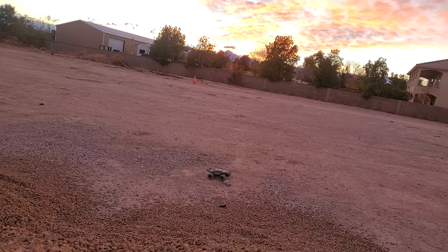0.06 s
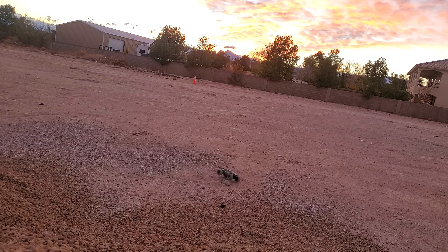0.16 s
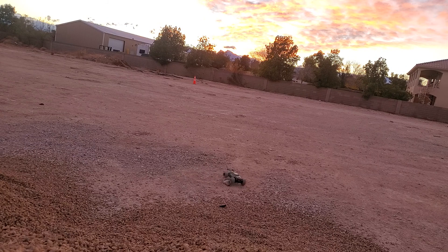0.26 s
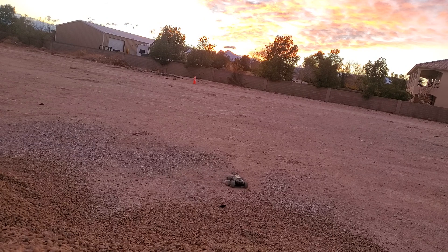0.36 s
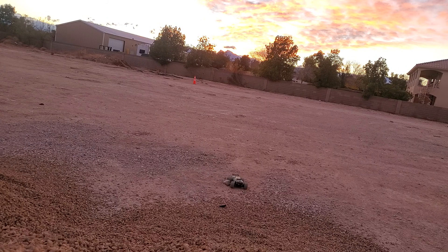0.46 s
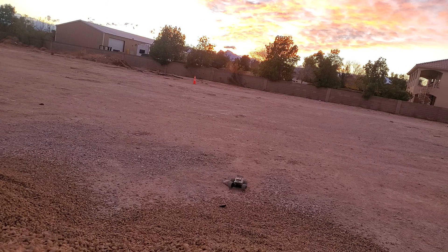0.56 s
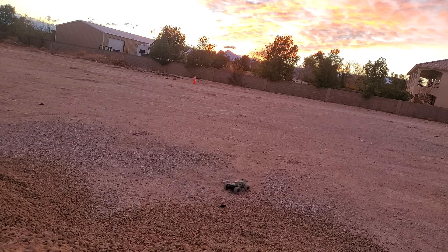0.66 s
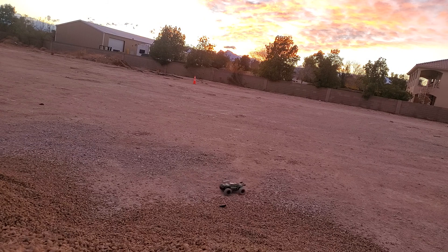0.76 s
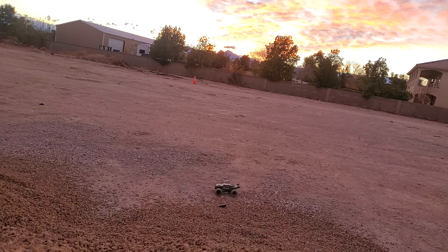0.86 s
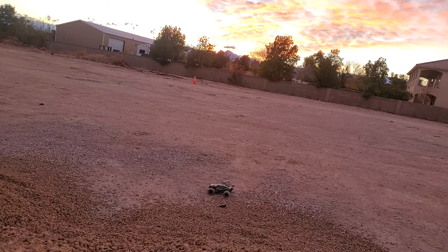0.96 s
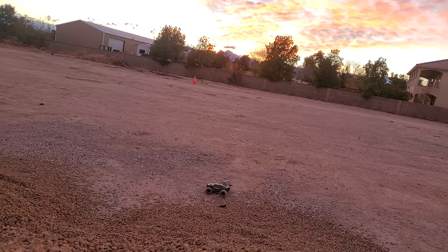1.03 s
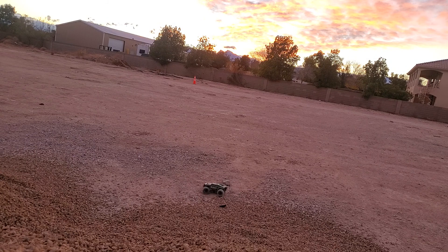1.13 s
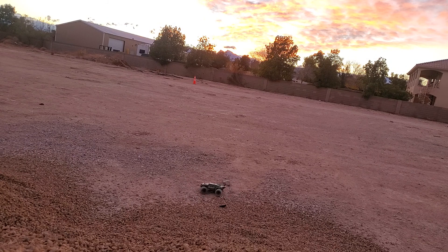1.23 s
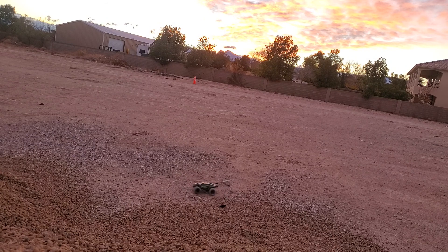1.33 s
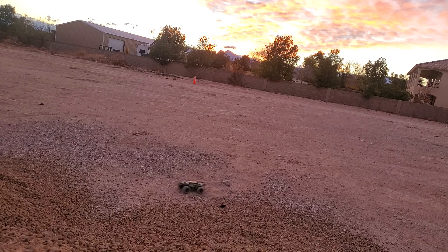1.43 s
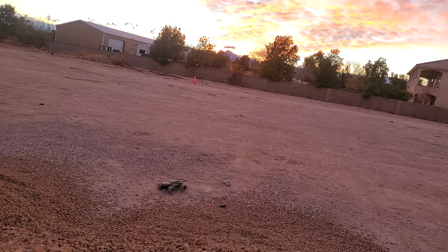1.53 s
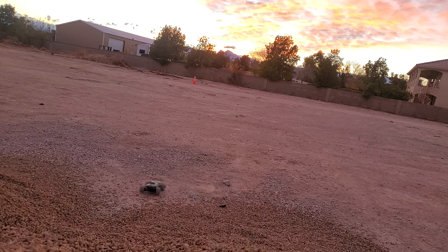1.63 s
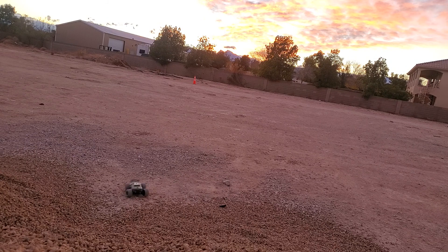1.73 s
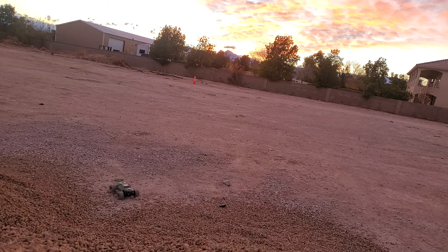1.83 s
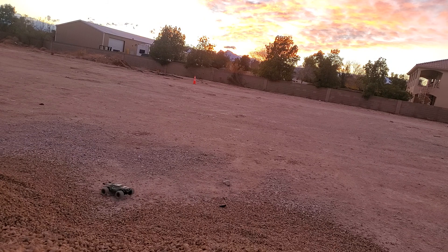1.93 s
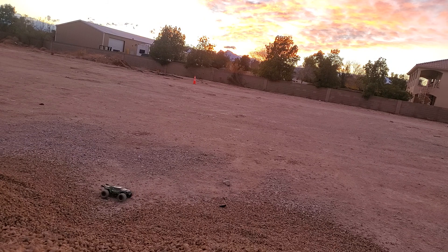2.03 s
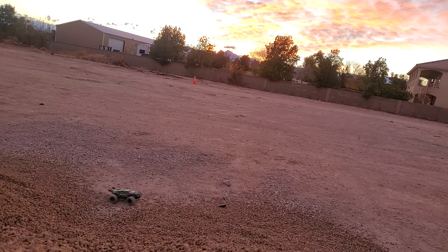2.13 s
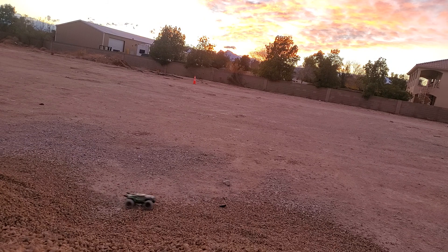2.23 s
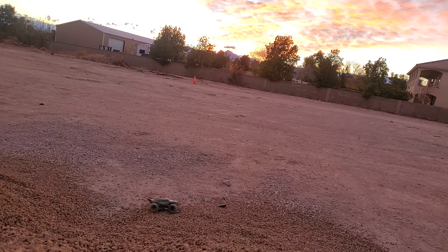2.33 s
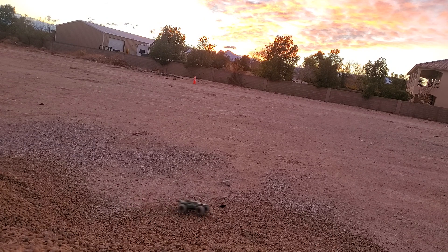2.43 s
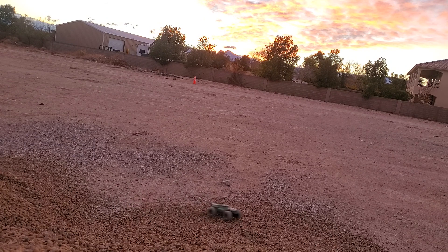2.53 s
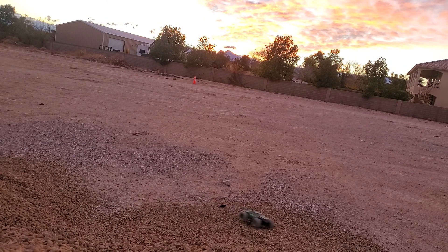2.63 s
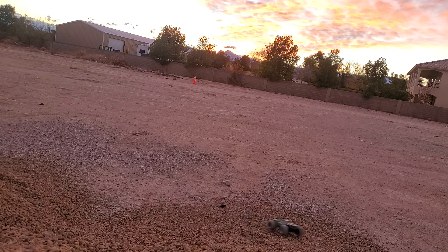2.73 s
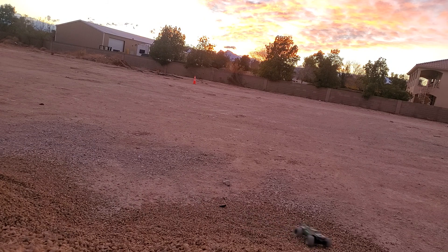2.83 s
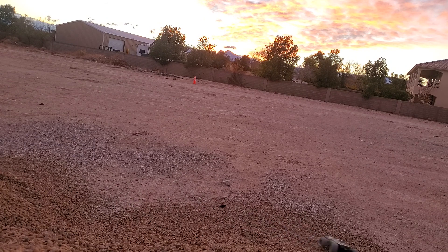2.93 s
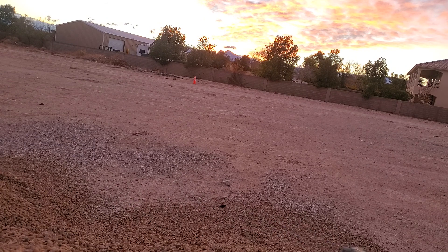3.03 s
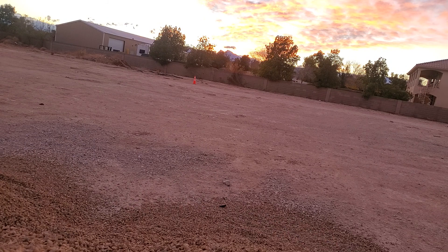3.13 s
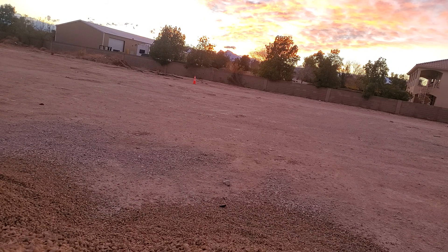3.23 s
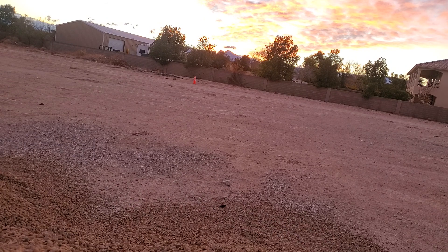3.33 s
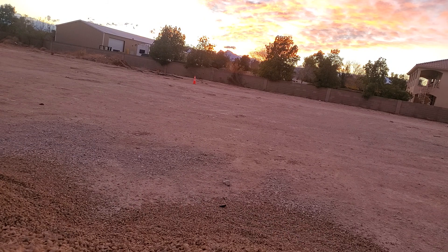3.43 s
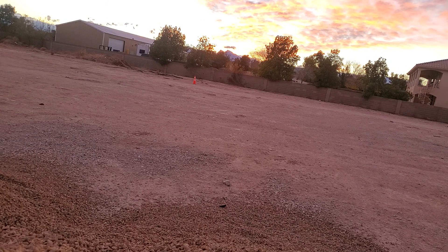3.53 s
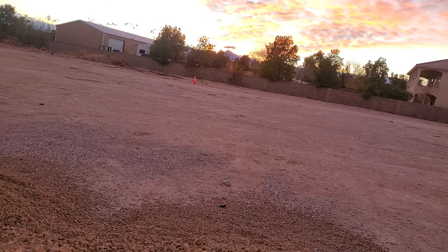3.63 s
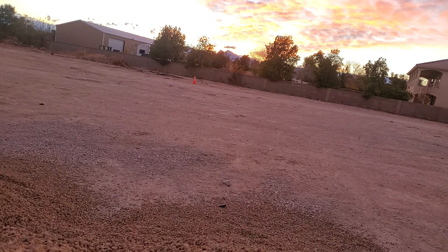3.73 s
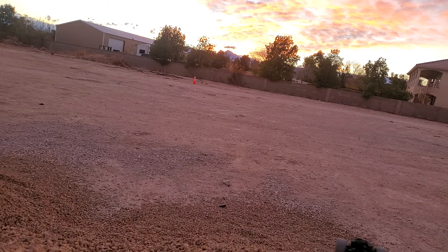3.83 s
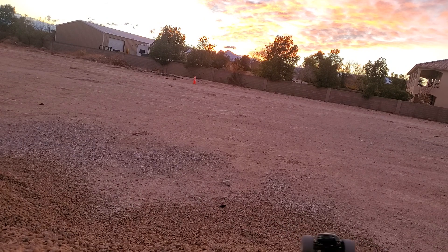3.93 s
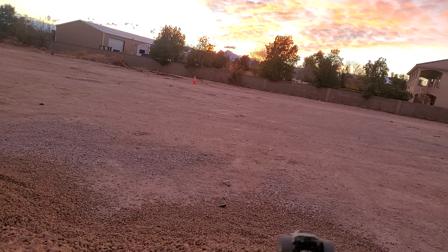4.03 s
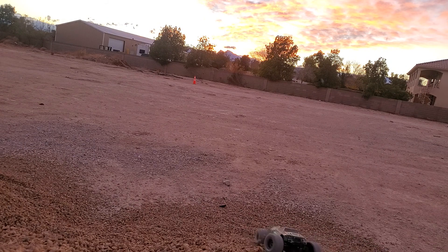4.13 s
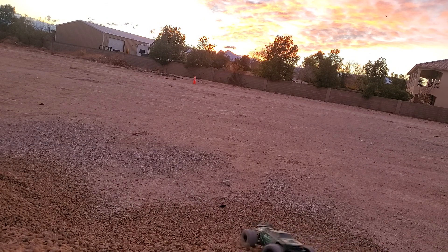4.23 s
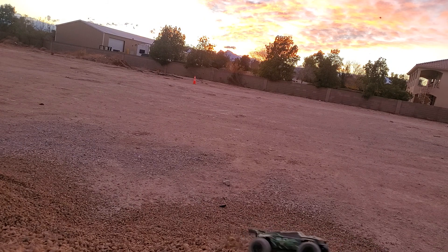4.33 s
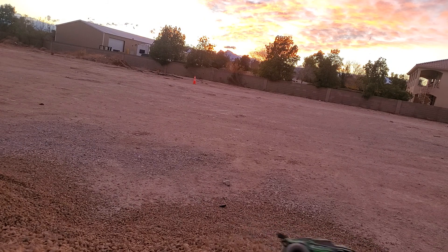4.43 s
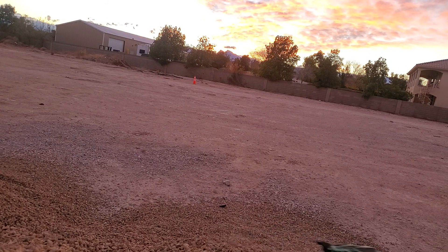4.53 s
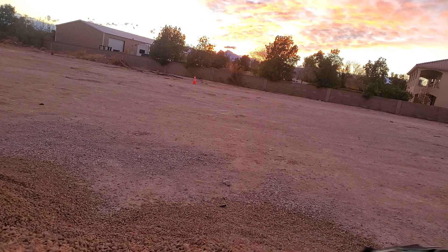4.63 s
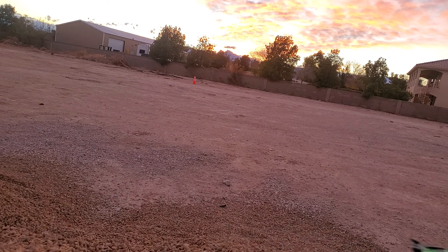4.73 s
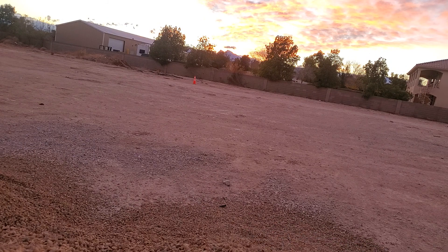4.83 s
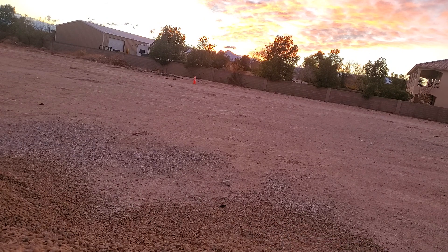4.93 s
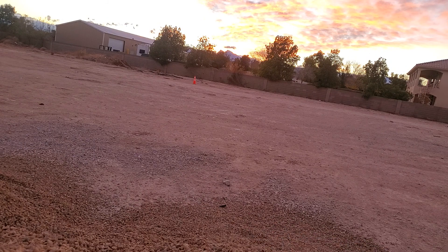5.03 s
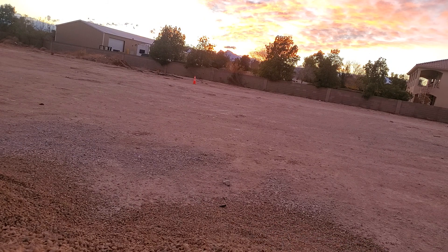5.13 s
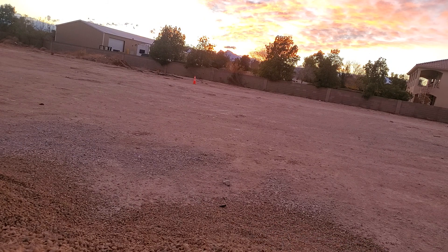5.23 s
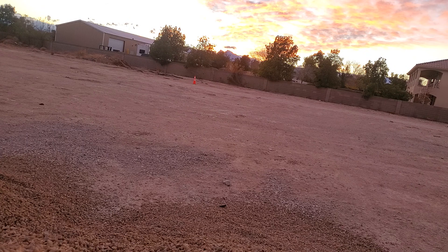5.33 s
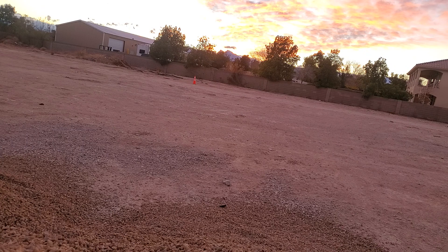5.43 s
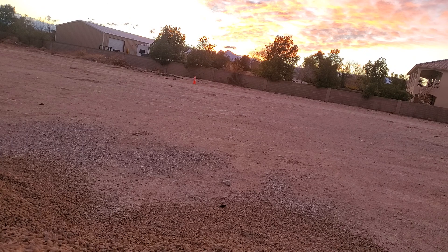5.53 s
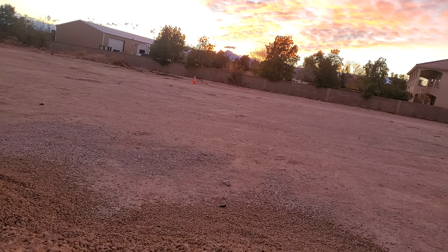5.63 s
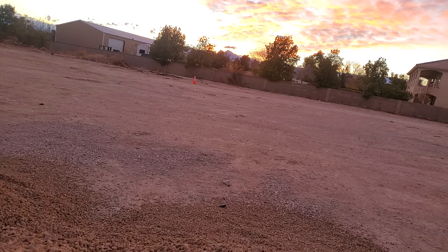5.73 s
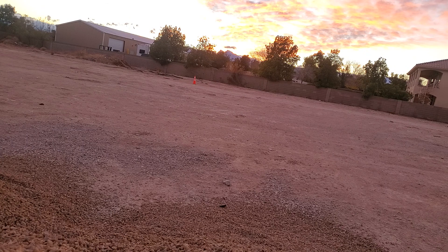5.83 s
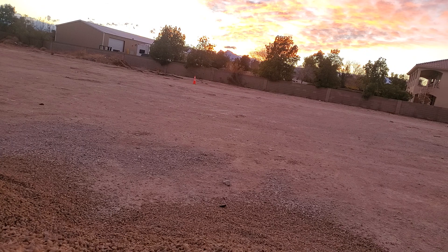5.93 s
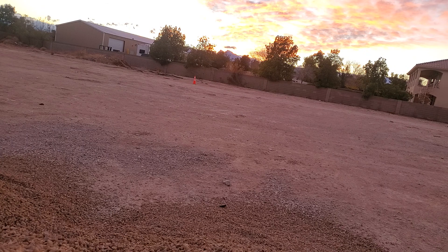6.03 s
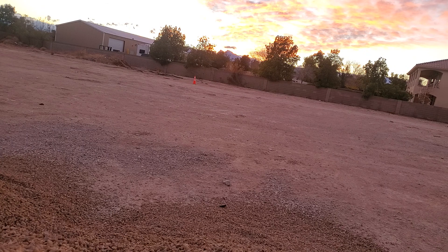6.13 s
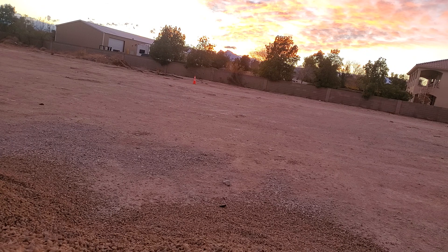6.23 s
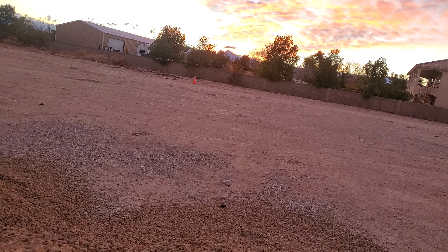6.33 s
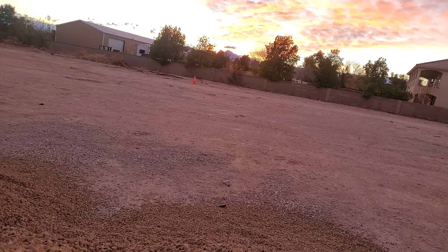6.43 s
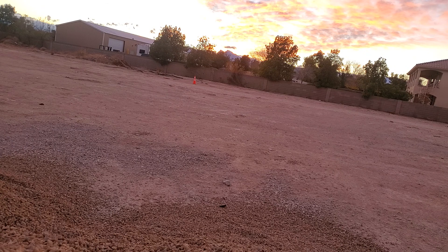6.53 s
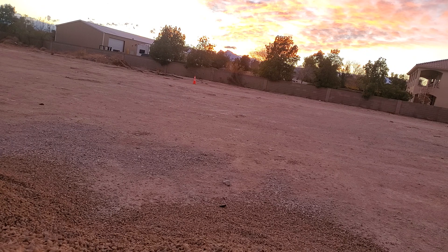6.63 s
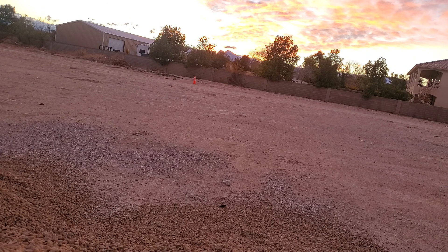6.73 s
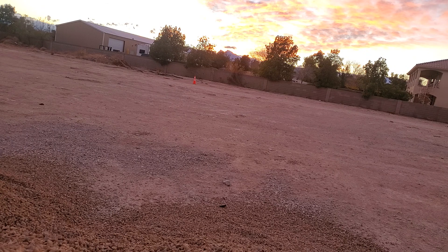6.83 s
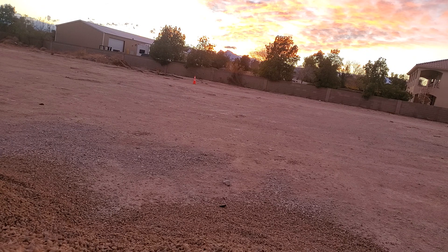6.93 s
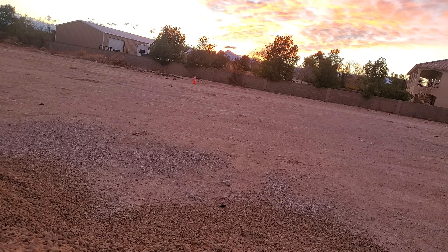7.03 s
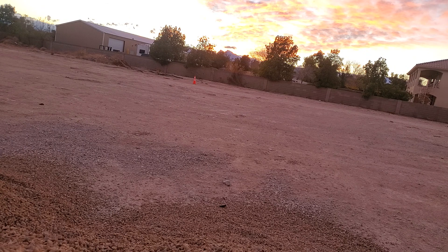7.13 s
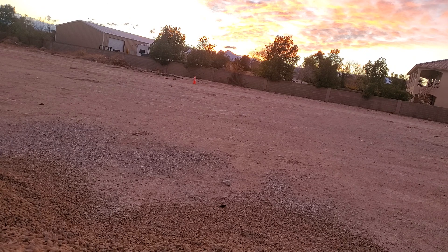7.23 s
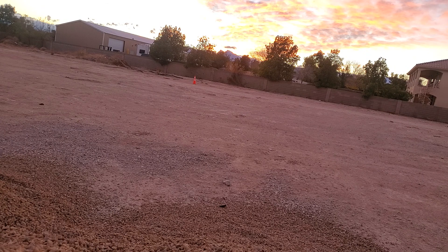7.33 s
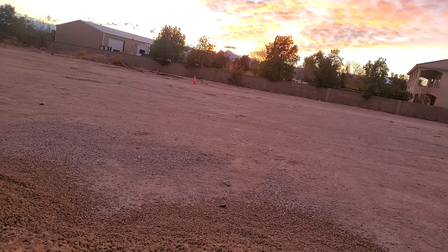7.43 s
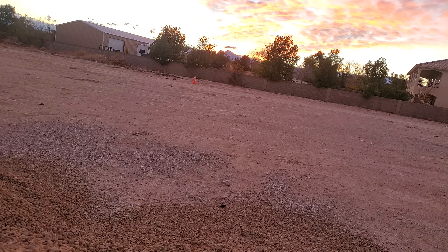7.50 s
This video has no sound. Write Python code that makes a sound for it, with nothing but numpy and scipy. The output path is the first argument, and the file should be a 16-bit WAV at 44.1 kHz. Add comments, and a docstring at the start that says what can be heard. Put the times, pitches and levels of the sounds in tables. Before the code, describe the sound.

A small radio-controlled car drives on dirt and gravel in an open yard, heard in stereo over a soft, low outdoor rumble. In the first second it makes short scuffing bursts near the centre, with a very faint thin whine around 0.5 seconds and a brief gear whir at 1 second. From about 1.3 seconds it weaves nearer, first slightly left and then to the right: hollow tyres drum and skid, stones crunch, grit sprays and the plastic chassis knocks over bumps. The loudest part comes from 3.9 to 4.7 seconds, as it sweeps close to the microphone and flung pebbles clack sharply on landing. From 5 seconds it is much quieter and off to the right, with a few fainter bursts of wheelspin and light knocks until the end at about 7.5 seconds.

```python
"""A small radio-controlled car on dirt and gravel in a yard; two spaced microphones, low outdoor rumble.
It starts with short throttle jabs, a thin drive whine and, at 1 s, a brief gear whir.
From 1.3 s it weaves nearer: hollow tyres drum, stones crunch, grit sprays, the chassis knocks.
At 3.9-4.7 s it sweeps close by, flung pebbles clacking as they land.
From 5 s it leaves to the right with a few fainter jabs."""
import sys
import numpy as np
from scipy import signal
from scipy.fft import rfft, irfft, next_fast_len
from scipy.io import wavfile
from scipy.ndimage import map_coordinates

SR = 44100
rng = np.random.default_rng(int(sys.argv[2]) if len(sys.argv) > 2 else 0)


def to_wav(s):
    """Save 16-bit WAV."""
    ch = np.atleast_2d(s).T  # columns
    pcm = np.round(np.clip(ch, -1, 1) * 32767)  # PCM
    wavfile.write(sys.argv[1], SR, pcm.astype(np.int16))


N = 333428

# Spectra, each: freq_hz, relative_db
# hollow tyres and shell
TYRE_SPECTRUM = [(150, -11.5), (330, -5.5), (430, -1), (560, 1), (720, 2), (880, -0.5), (1150, -4.5),
                 (1400, -12.5), (1700, -7), (2200, -9.5), (3200, -66), (6000, -19)]
# car's weight hitting the ground
THUD_SPECTRUM = [(50, -32), (90, 0.5), (150, -2), (250, -1), (400, -5), (800, -38), (2000, -33)]
# tread sliding on packed dirt
RASP_SPECTRUM = [(700, -6.5), (1100, -0.5), (1450, 4), (1900, 0), (2400, -8.5), (3100, -8.5), (4200, -6),
                 (7000, -51.5)]
# colliding stones
STONE_SPECTRUM = [(1200, -4.5), (2300, 1), (3200, -0.5), (4400, 2), (5800, 0), (6600, -2), (7300, -9.5),
                  (7900, -11), (11000, -6.5)]
# fine grit
GRIT_SPECTRUM = [(5000, -9), (8000, -9.5), (8800, -7), (10000, -6), (12500, 0.5), (15500, 5)]


def from_db(db):
    """Decibels to gain."""
    return 10 ** (np.asarray(db) / 20)


def unit_rms(x):
    """Scale to unit power."""
    return x / np.sqrt(np.mean(x ** 2) + 1e-20)


def curves(rows):
    """Columns after time_s, interpolated to every sample."""
    time_s, *columns = np.transpose(rows)
    return [np.interp(np.arange(N) / SR, time_s, column) for column in columns]


def at_times(curve, time_s):
    """A curve's values at given moments."""
    return np.interp(time_s * SR, np.arange(N), curve)


def hump(centre_s, length_s):
    """Gaussian bump of height 1."""
    return np.exp(-np.minimum(2 * ((np.arange(N) / SR - centre_s) / length_s) ** 2, 50))


def drift(rate_hz):
    """Slow random wander, unit RMS."""
    step = 40
    pole = np.exp(-2 * np.pi * step * rate_hz / SR)
    noise = rng.standard_normal(N // step + 2002)
    slow = signal.lfilter([1], [1, -2 * pole, pole * pole], noise)[2000:]
    return np.interp(np.arange(N) / step, np.arange(len(slow)), unit_rms(slow))


def colour(x, spectrum, size=2048):
    """Minimum-phase filter, one row per channel; white noise keeps its power."""
    freq_hz, relative_db = np.transpose(spectrum)
    grid_hz = np.maximum(np.arange(size + 1) * SR / (2 * size), 1)
    gain = from_db(np.interp(np.log(grid_hz), np.log(freq_hz), relative_db))
    cepstrum = irfft(np.log(gain))
    cepstrum[1:size] *= 2
    cepstrum[size + 1:] = 0
    response = irfft(np.exp(rfft(cepstrum)))[:size]
    return signal.oaconvolve(np.atleast_2d(x), [response / np.linalg.norm(response)], axes=1)[:, :N]


def ring(x, pitch_hz, cycles):
    """Unity-gain resonance, down 60 dB after `cycles`."""
    pitch_hz = min(pitch_hz, SR * .45)
    r = np.exp(-np.log(1000) * pitch_hz / (cycles * SR))
    poles = [1, -2 * r * np.cos(2 * np.pi * pitch_hz / SR), r * r]
    return signal.lfilter([(1 - r * r) / 2, 0, (r * r - 1) / 2], poles, x + 1e-18)


def contacts(per_s, spread_db, low_hz, high_hz, cycles, count):
    """Random collisions, mostly weak, each ringing one of `count` resonances; unit RMS."""
    onsets = np.flatnonzero(rng.random(N) < per_s / SR)
    sizes = from_db(spread_db * np.minimum(rng.exponential(1, N), 4)) * rng.choice([-1, 1], N)
    mode_of, out = rng.integers(0, count, N), np.zeros(N)
    for mode, pitch_hz in enumerate(np.geomspace(low_hz, high_hz, count)):
        clicks, struck = np.zeros(N), onsets[mode_of[onsets] == mode]
        clicks[struck] = sizes[struck] / np.sqrt(per_s[struck])
        out += ring(clicks, pitch_hz, cycles)
    return unit_rms(out)


def impacts(starts_s, levels_db, pitches_hz, cycles, ringing, fall_s, tail_db, tail_s, size=4096):
    """Short noise cracks with a weaker tail, each ringing at its own pitch."""
    age_s, out = np.arange(size) / SR, np.zeros(N + size)
    attack = 1 - np.exp(-2 * age_s / fall_s)
    envelope = attack * (np.exp(-age_s / fall_s) + from_db(tail_db) * np.exp(-age_s / tail_s))
    for start_s, level_db, pitch_hz in zip(starts_s, levels_db, pitches_hz):
        crack = unit_rms(envelope * rng.standard_normal(size))
        hit = unit_rms(crack + ringing * unit_rms(ring(crack, pitch_hz, cycles)))
        start = max(int(start_s * SR), 0)
        out[start:start + size] += from_db(level_db) * envelope.std() * hit
    return out[:N]


def random_hits(low_hz, high_hz, count):
    """Hits over the whole drive: start_s, pitch_hz, size (-1 to 1)."""
    when, pitch, size = rng.random((count, 3)).T
    return when * (N - 1) / SR, low_hz * (high_hz / low_hz) ** pitch, 2 * size - 1


def rumble():
    """Far traffic and air: common to both microphones in the bass, diffuse above."""
    # freq_hz, relative_db
    spectrum = [(22, -75), (38, -10), (55, 0.5), (95, -0.5), (160, -9), (240, -14), (420, -26.5),
                (700, -21), (1300, -33), (2500, -54), (6000, -42.5), (15000, -86)]
    fade_db_per_s = 0.53
    common, separate = rng.standard_normal(N), rng.standard_normal((2, N))
    diffuse = signal.sosfilt(signal.butter(1, 900, "high", fs=SR, output="sos"), separate)
    level_db = -48.5 - fade_db_per_s * np.arange(N) / SR + drift(2.8)
    return from_db(level_db) * colour(common + 0.081 * separate + 2.0 * diffuse, spectrum)


def bass_swells(pitch_hz=56):
    """The rumble throbs irregularly at a wandering pitch."""
    # centre_s, length_s, level_db
    swells = [(0.025, .07, -44), (0.198, 0.1, -48), (1.3, 0.11, -48), (1.514, .06, -48),
              (2.42, 0.077, -45.5), (2.535, .06, -45.5), (3.6, 0.1, -49), (3.8, .24, -46),
              (3.99, 0.047, -45), (4.25, 0.036, -47), (4.933, .06, -46), (5.71, 0.05, -44),
              (6.305, .15, -51)]
    phase = 2 * np.pi * np.cumsum(pitch_hz * (1 + .14 * drift(25))) / SR
    envelope = sum(from_db(db) * hump(centre_s, length_s) for centre_s, length_s, db in swells)
    return np.sqrt(2) * np.sin(phase) * envelope


def ground_echoes(x, fall_s, low_hz, count, size=4096):
    """Stony ground returns short, drifting echo clouds, different at each microphone."""
    clouds = rng.standard_normal((count, 2, size)) * np.exp(-np.arange(size) / SR / fall_s)
    clouds /= np.linalg.norm(clouds, axis=2, keepdims=True)
    shares = np.array([drift(5) for _ in range(count)])
    shares /= np.linalg.norm(shares, axis=0)
    bright = signal.sosfilt(signal.butter(2, low_hz, "high", fs=SR, output="sos"), x)
    return sum(share * signal.oaconvolve(bright[None], cloud, axes=1)[:, :N]
               for share, cloud in zip(shares, clouds))


def with_ground_ring(x, lag_ms, centre_hz=830, hz_per_ms=1000, width_hz=140, block=256):
    """Ground reflection adds a hollow ring that glides with the car's bearing."""
    ringing, state = np.zeros(N), np.zeros(2)
    r = np.exp(-np.pi * width_hz / SR)
    angle = 2 * np.pi * (centre_hz + hz_per_ms * lag_ms) / SR
    for i in range(0, N, block):
        poles = [1, -2 * r * np.cos(angle[i]), r * r]
        ringing[i:i + block], state = signal.lfilter([1, 0, -1], poles, x[i:i + block], zi=state)
    return x + from_db(-3.5) * (1 - r * r) / 2 * ringing


def at_microphones(x, lag_ms):
    """Stereo by arrival time; the left microphone is lag_ms later."""
    half_lag = lag_ms * SR / 2000
    return np.array([map_coordinates(x, [np.arange(N) - side * half_lag], order=3) for side in (1, -1)])


def shaded(pair, lag_ms, corner_hz=5000, db_per_ms=10):
    """The housing shades the far microphone: treble leans towards the car."""
    treble = signal.sosfiltfilt(signal.butter(1, corner_hz, "high", fs=SR, output="sos"), pair)
    gains = from_db(db_per_ms * lag_ms * np.array([[-1], [1]]))
    gains /= np.sqrt(np.mean(gains ** 2, axis=0))
    return pair + treble * (gains - 1)


def motor():
    """Harmonics 2 and 3 of an unsteady gear mesh; the drive's switching whine at part throttle."""
    # time_s, mesh_hz, level_db
    gear_whir = [(0.99, 2350, -85), (1.01, 2600, -57), (1.035, 3300, -60), (1.055, 3300, -63),
                 (1.07, 3000, -59), (1.085, 2900, -90)]
    whine_start_s, whine_end_s, whine_hz, whine_db = 0.37, 0.65, 12040, -74
    time_s = np.arange(N) / SR
    mesh_hz, whir_db = curves(gear_whir)
    phase = 2 * np.pi * np.cumsum(mesh_hz * (1 + .06 * drift(500))) / SR
    whir = from_db(whir_db) * (np.sin(2 * phase) + .25 * np.sin(3 * phase))
    swell = np.sin(np.pi * np.clip((time_s - whine_start_s) / (whine_end_s - whine_start_s), 0, 1))
    return whir + from_db(whine_db) * swell * np.sin(2 * np.pi * whine_hz * time_s)


def chassis_buzz(tyre_db, pitch_hz=4380):
    """The shaking plastic chassis chatters in one narrow band."""
    chatter = contacts(np.full(N, 900), spread_db=2.0, low_hz=.97 * pitch_hz, high_hz=1.03 * pitch_hz,
                       cycles=40, count=3)
    return chatter * from_db(-62 + .65 * (tyre_db + 46.5))


def stone_rattle(crunch_db):
    """Coarse stones knock together in short ringing flurries."""
    flurry_db = 3.3 * drift(22)
    per_s = 380 * from_db(flurry_db + .1 * (crunch_db + 43))
    stones = contacts(per_s, spread_db=2.0, low_hz=2300, high_hz=7000, cycles=42, count=17)
    return unit_rms(colour(stones, STONE_SPECTRUM)[0] * from_db(.5 * flurry_db)) * from_db(crunch_db - 6.5)


def with_bites(crunch_db, spray_db, fall_db_per_s=344):
    """A tyre bites into a patch of stones: both levels jump, then decay."""
    # start_s, crunch_db, spray_db
    bites = [(0.043, -46.5, -46), (0.145, -54, -62), (0.309, -47.5, -54), (0.425, -56, -54),
             (0.735, -59, -61), (0.851, -50, -50), (1.203, -62, -56), (1.625, -40, -54),
             (2.365, -35.5, -35), (2.491, -43, -34), (2.514, -41, -32), (2.649, -38, -36),
             (2.692, -37, -32), (2.79, -58, -46), (2.974, -37, -34), (3.739, -31, -35), (4.046, -31, -27),
             (4.21, -40, -42), (4.275, -50, -35), (4.692, -39, -42), (4.728, -36, -25), (4.968, -45.5, -49),
             (5.074, -59, -47), (5.147, -59, -51), (5.289, -56, -49), (6.099, -59.5, -73), (7.1, -57, -57)]
    power = from_db([crunch_db, spray_db]) ** 2
    decay = from_db(-fall_db_per_s * np.arange(SR // 2) / SR) ** 2
    for start_s, *levels_db in bites:
        span = power[:, int(start_s * SR):][:, :len(decay)]
        span += np.outer(from_db(levels_db) ** 2, decay[:span.shape[1]])
    return 10 * np.log10(power)


def gravel(crunch_db, spray_db):
    """Stones grind in clumps and throw grit; harder wheelspin, denser collisions."""
    clumps_db = 1.9 * drift(30)
    per_s = 4000 * from_db(.5 * (crunch_db + 43.5))
    stones = contacts(per_s, spread_db=2.0, low_hz=2094, high_hz=7520, cycles=15.6, count=22)
    grit = contacts(1.1 * per_s, spread_db=5.6, low_hz=8700, high_hz=16000, cycles=8.4, count=20)
    crunch = unit_rms(colour(stones, STONE_SPECTRUM)[0]) * from_db(crunch_db - 1.0 + clumps_db)
    spray = unit_rms(colour(grit, GRIT_SPECTRUM)[0]) * from_db(spray_db + clumps_db)
    return crunch + spray


def pebbles(crunch_db, spray_db, flight_s=0.04):
    """Flung pebbles clack on landing; random chips mostly tick, as hard as they were thrown."""
    # start_s, clack_db, clack_hz, tick_db
    big_pebbles = [(0.0434, -36.5, 4070, -46), (0.1475, -45, 4280, -45), (0.649, -30, 4230, -52),
                   (0.9313, -46, 4180, -44), (1.026, -40.5, 1890, -49), (1.204, -45, 4330, -55),
                   (1.5393, -42, 4400, -26), (1.5553, -31, 4570, -26), (1.6291, -38, 6300, -27),
                   (1.761, -31, 3580, -33), (2.1868, -22.5, 5000, -25), (2.2318, -34, 4200, -22),
                   (2.3687, -22, 4450, -20), (2.4513, -48, 5800, -22), (2.602, -40, 6000, -25),
                   (2.684, -31, 6700, -40), (2.772, -47, 6000, -20.5), (2.866, -28, 4870, -39),
                   (2.9216, -44, 4700, -21.5), (3.249, -31, 5230, -45), (3.4762, -27.5, 4140, -21),
                   (3.883, -21, 5700, -26), (3.889, -18.5, 6700, -13), (3.9264, -17, 5540, -19),
                   (3.9775, -16, 5330, -18), (4.058, -15, 5560, -26), (4.0646, -23, 5630, -25),
                   (4.321, -16.5, 5600, -20), (4.4802, -17.5, 5600, -16), (4.505, -17.5, 5850, -29),
                   (4.5105, -13, 5100, -22), (4.522, -24, 5870, -31), (4.5544, -18, 5000, -22),
                   (4.5622, -14, 5550, -21), (4.695, -25, 4900, -33), (4.7303, -25.5, 2220, -23),
                   (4.933, -29, 5640, -28), (4.9755, -33.5, 4700, -31), (5.1474, -47, 6500, -38),
                   (5.3378, -79, 6200, -40), (5.4379, -48, 2160, -47), (5.646, -47, 5600, -34),
                   (5.72, -44, 2970, -56), (6.5178, -48, 2190, -34.5)]
    landing_s, chip_hz, size = random_hits(low_hz=3900, high_hz=6400, count=70)
    thrown_s, size_db = landing_s - flight_s, 2.5 * size
    chip_clack_db = at_times(crunch_db, thrown_s) - 3.0 + size_db
    chip_tick_db = at_times(spray_db, thrown_s) + 5.0 + size_db
    chips = np.column_stack([landing_s, chip_clack_db, chip_hz, chip_tick_db])
    start_s, clack_db, clack_hz, tick_db = np.vstack([big_pebbles, chips]).T
    clacks = impacts(start_s, clack_db + 5.5, clack_hz, cycles=24, ringing=.45,
                     fall_s=.0008, tail_db=-12, tail_s=.004)
    tick_hz = rng.uniform(8800, 18000, len(start_s))
    ticks = impacts(start_s, tick_db + 13.5, tick_hz, cycles=25, ringing=.4,
                    fall_s=.0003, tail_db=-24, tail_s=.003)
    return (colour(clacks, STONE_SPECTRUM) + colour(ticks, GRIT_SPECTRUM))[0]


def scuffs():
    """Tread sticks and slips sideways, drumming the tyre and rasping the dirt."""
    # centre_s, length_s, level_db
    skids = [(0.521, 0.033, -43), (1.433, 0.0068, -29), (1.488, 0.021, -34), (1.564, 0.024, -37.5),
             (1.6, 0.013, -44), (1.65, .03, -46), (1.746, 0.023, -49), (1.88, .04, -49),
             (2.068, 0.032, -32), (2.17, 0.031, -30.5), (2.24, .025, -38), (2.353, 0.03, -40),
             (2.872, 0.015, -39), (6.225, .03, -49), (6.334, 0.049, -49)]
    slips = contacts(np.full(N, 1500), spread_db=3.5, low_hz=530, high_hz=2580, cycles=17, count=14)
    scrape = unit_rms(colour(slips, TYRE_SPECTRUM) + from_db(-6.0) * colour(slips, RASP_SPECTRUM))[0]
    return scrape * sum(from_db(db - 3.0) * hump(centre_s, length_s) for centre_s, length_s, db in skids)


def knocks(tyre_db):
    """Bumps strike tyres and chassis: hard ones at set times, light ones at random."""
    # start_s, level_db, pitch_hz
    hard_bumps = [(0.602, -36.5, 740), (0.65, -37, 810), (1.025, -47.5, 1550), (1.448, -29.5, 840),
                  (1.655, -41, 586), (1.765, -54, 700), (1.994, -33.5, 825), (2.338, -34.5, 860),
                  (2.65, -38.5, 335), (2.696, -33, 520), (3.159, -36.5, 820), (3.363, -33.5, 520),
                  (3.606, -33.5, 640), (3.865, -36, 750), (3.914, -31.5, 685), (3.988, -27, 960),
                  (4.073, -29, 840), (4.172, -32, 520), (4.225, -35, 557), (4.277, -23, 735),
                  (4.317, -25, 567), (4.349, -32, 940), (4.375, -28, 875), (4.458, -25, 810),
                  (4.478, -27, 885), (4.532, -30, 530), (4.638, -29, 820), (4.727, -25, 650),
                  (4.738, -32, 564), (4.756, -33.5, 715), (4.773, -33, 875), (4.815, -34.5, 500),
                  (4.83, -42, 750), (4.889, -34, 804), (4.908, -33, 505), (5.08, -48, 1010),
                  (5.291, -52, 1230), (5.438, -47, 900), (5.463, -47, 596), (5.535, -53.5, 650),
                  (5.722, -45, 710), (5.875, -47, 630), (6.098, -48.5, 646), (6.186, -45, 670),
                  (6.215, -42, 660), (6.293, -51, 654), (6.54, -47, 686), (6.681, -43, 930),
                  (7.339, -50, 630), (7.386, -39.5, 650)]
    light_s, light_hz, size = random_hits(low_hz=464, high_hz=1070, count=36)
    light_bumps = np.column_stack([light_s, at_times(tyre_db, light_s) - 3 + 3 * size, light_hz])
    start_s, level_db, pitch_hz = np.vstack([hard_bumps, light_bumps]).T
    bumps = impacts(start_s, level_db, pitch_hz, cycles=10, ringing=.3,
                    fall_s=.004, tail_db=-12, tail_s=.009)
    drum_and_rasp = colour(bumps, TYRE_SPECTRUM) + colour(bumps, RASP_SPECTRUM)
    return (from_db(0.5) * drum_and_rasp + from_db(-10.5) * colour(bumps, THUD_SPECTRUM))[0]


def drumming_db():
    """Tyre level: steady rolling plus throttle jabs that spin the wheels."""
    # set by speed and nearness: time_s, level_db
    rolling = [(0.0, -59.5), (0.8, -57.5), (1.07, -63), (1.1, -82), (1.19, -62), (1.32, -43), (1.66, -49.5),
               (1.84, -54), (2.08, -39), (2.5, -43.5), (2.95, -41.5), (3.33, -40.5), (3.55, -40.5),
               (3.95, -32.5), (4.4, -33), (4.66, -32.5), (4.82, -42.5), (4.92, -44), (5.08, -56),
               (5.45, -63.5), (6.8, -60), (7.05, -61.5), (7.55, -61)]
    # peak_s, hold_s, level_db, rise_db_per_s, fall_db_per_s
    throttle_jabs = [(0.0, 0.011, -48, 200, 57), (0.611, 0.037, -39.5, 134, 178),
                     (1.392, 0.1, -36.5, 113, 130), (2.153, 0.093, -38.5, 60, 123),
                     (3.067, 0.13, -41.5, 208, 250), (3.4, 0.07, -35, 300, 211),
                     (3.62, 0.055, -36, 397, 150), (4.279, 0.04, -34, 302, 246),
                     (4.478, 0.057, -31, 301, 141), (5.62, 0.15, -49, 180, 194),
                     (6.184, 0.058, -44.5, 133, 167), (6.308, 0.028, -45.5, 215, 80),
                     (6.638, 0.061, -49.5, 34, 97), (7.363, 0.051, -46.5, 132, 252)]
    time_s, power = np.arange(N) / SR, from_db(curves(rolling)[0]) ** 2
    for peak_s, hold_s, level_db, rise_db_per_s, fall_db_per_s in throttle_jabs:
        before_db = rise_db_per_s * np.maximum(peak_s - time_s, 0)
        after_db = fall_db_per_s * np.maximum(time_s - peak_s - hold_s, 0)
        power += from_db(level_db - before_db - after_db) ** 2
    return 10 * np.log10(power)


def tyres(level_db):
    """Tread lugs slap the ground and drum the hollow tyres; sliding rasps, the car's weight thuds."""
    # sliding on packed dirt, relative to level_db: time_s, rasp_db
    slide = [(0, -1), (0.6, -10.5), (1.0, -6), (1.45, -2), (2.8, -4.5), (3.3, -12), (4.0, -10), (4.45, -3),
             (4.9, -12), (5.7, -6.5), (6.3, -7.5), (6.7, -2), (7.5, -11)]
    slaps_per_s = 1100 * from_db(.3 * (level_db + 41.0))
    slaps = contacts(slaps_per_s, spread_db=1.5, low_hz=410.5, high_hz=2360, cycles=11.5, count=16)
    lumps = drift(20)
    drumming = unit_rms(colour(slaps, TYRE_SPECTRUM)[0]) * from_db(level_db - 3.0 + 2.2 * lumps)
    grains_per_s = 3000 * from_db(.3 * (level_db + 43.5))
    sand = contacts(grains_per_s, spread_db=0.0, low_hz=1145, high_hz=3650, cycles=15.0, count=12)
    rasp = unit_rms(colour(sand, RASP_SPECTRUM)[0]) * from_db(level_db + curves(slide)[0] + 1.8 * lumps)
    jolts_per_s = 160 * from_db(0.18 * (level_db + 42.0))
    jolts = contacts(jolts_per_s, spread_db=2.0, low_hz=97, high_hz=440, cycles=2.1, count=6)
    thud_db = -50.0 + 0.68 * (level_db + 41.5) + 2.0 * lumps
    return drumming + rasp + unit_rms(colour(jolts, THUD_SPECTRUM)[0]) * from_db(thud_db)


def scene():
    """The car crosses the microphones; its spray of stones is wider than the car."""
    # car's bearing, positive to the right: time_s, lag_ms
    path = [(0, -0.022), (1.15, -0.018), (1.4, -0.03), (1.65, -0.12), (1.95, -0.142), (2.2, -0.14),
            (2.4, -0.091), (2.68, 0.095), (2.82, 0.12), (3.0, 0.16), (3.2, 0.24), (3.45, 0.26), (3.7, 0.22),
            (3.93, 0.14), (4.15, 0.097), (4.37, 0.083), (4.6, 0.18), (4.77, 0.27), (4.95, 0.297),
            (5.2, 0.35), (5.8, 0.41), (6.2, 0.41), (6.6, 0.34), (7.0, 0.29), (7.55, 0.29)]
    # packed dirt to loose stones, relative to tyre_db: time_s, crunch_db, spray_db
    surface = [(0.0, -4, -4), (0.22, -0.5, -3), (0.26, -11, -7), (0.3, -26, -10), (0.34, -4, -7),
               (0.52, 3.5, -8), (0.64, -1, -8), (0.92, -8, 4), (1.06, 4.5, 10), (1.11, -21, 3),
               (1.19, -28, -5), (1.25, -6.5, -8), (1.42, -4.5, -6.5), (1.72, 2, 4), (2.15, -4, -4),
               (2.55, 2, 5.5), (2.9, -2.5, 4.5), (3.15, -2.5, -2), (3.33, -0.5, -2.5), (3.43, -7, -5.5),
               (3.55, 3.5, 2.5), (3.67, -4, -4), (3.78, 2, 3), (4.0, 2, 2), (4.5, -2, 0), (4.68, 0, 0.5),
               (4.83, 2.5, 7), (4.95, -1, 6), (5.7, -12, -10.5), (6.25, -7, -8), (6.75, -1.5, 0),
               (7.4, -5.5, -6.5)]
    # wheels skip clear of the ground: centre_s, length_s
    hops = [(1.593, .016), (1.688, 0.022), (2.302, 0.03), (2.766, 0.0081), (3.578, 0.015), (4.262, 0.0075),
            (4.433, 0.023), (4.688, 0.025), (4.784, 0.022), (4.877, 0.055), (6.27, 0.031), (6.415, 0.037),
            (6.568, 0.034)]
    tyre_db = drumming_db()
    crunch_db, spray_db = tyre_db + np.array(curves(surface))
    lag_ms, = curves(path)
    contact_db = tyre_db - 5.5 * sum(hump(centre_s, length_s) for centre_s, length_s in hops)
    wheels = tyres(contact_db) + knocks(contact_db) + scuffs()
    body = with_ground_ring(wheels, lag_ms) + chassis_buzz(tyre_db)
    landings = pebbles(crunch_db, spray_db)
    crunch_db, spray_db = with_bites(crunch_db, spray_db)
    underside = gravel(crunch_db - 3.0, spray_db - 9.5) + stone_rattle(crunch_db) + motor()
    flung = gravel(crunch_db - 9.5, spray_db - 6.5)
    car = body + underside + landings
    direct = at_microphones(car, lag_ms) + at_microphones(flung, lag_ms + 0.052 * drift(46))
    near = from_db(1.0) * ground_echoes(underside + flung, fall_s=0.0045, low_hz=6200, count=4, size=1024)
    yard = from_db(-16.5) * ground_echoes(car, fall_s=.016, low_hz=240, count=2)
    return shaded(direct + near + yard, lag_ms) + rumble() + bass_swells()


def record(dry):
    """Each microphone port has its own colour; steep low-pass on top."""
    # freq_hz, left_minus_right_db
    port_balance = [(100, 1.6), (600, 1.5), (1000, 1.8), (1350, 0.5), (2600, 1.6), (4500, 0.2), (5300, 0.5),
                    (6200, -7.5), (6900, 5), (7350, 11), (8100, 0.5), (12000, 2.5), (15500, -2.5)]
    cutoff_hz = 16000
    freq_hz, difference_db = np.transpose(port_balance)
    size = next_fast_len(N + 2048)
    grid_hz = np.arange(size // 2 + 1) * SR / size
    lean_db = np.interp(grid_hz, freq_hz, difference_db) * np.array([[.5], [-.5]])
    ports = irfft(rfft(dry, size) * from_db(lean_db), size)[:, :N]
    return signal.sosfilt(signal.ellip(12, .2, 80, cutoff_hz, fs=SR, output="sos"), ports)


dry = scene()
out = record(dry)
to_wav(out)
```